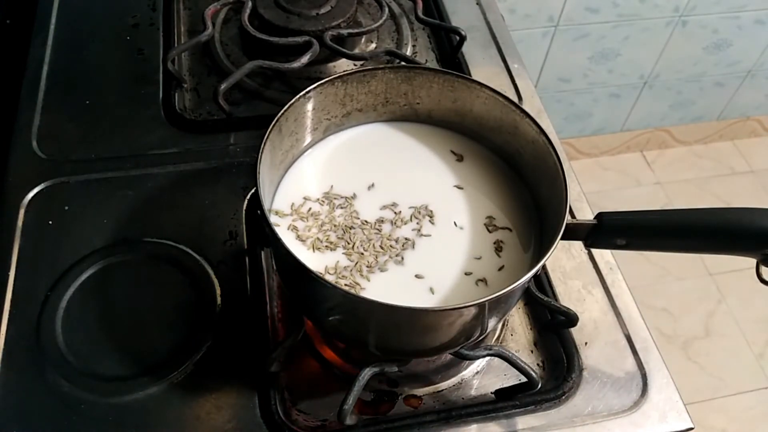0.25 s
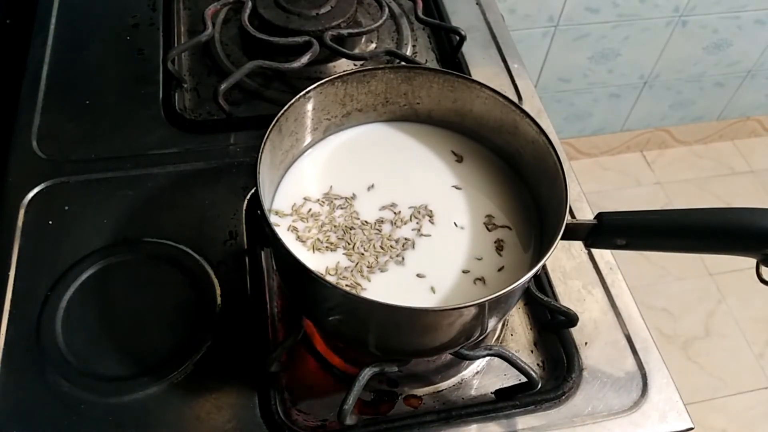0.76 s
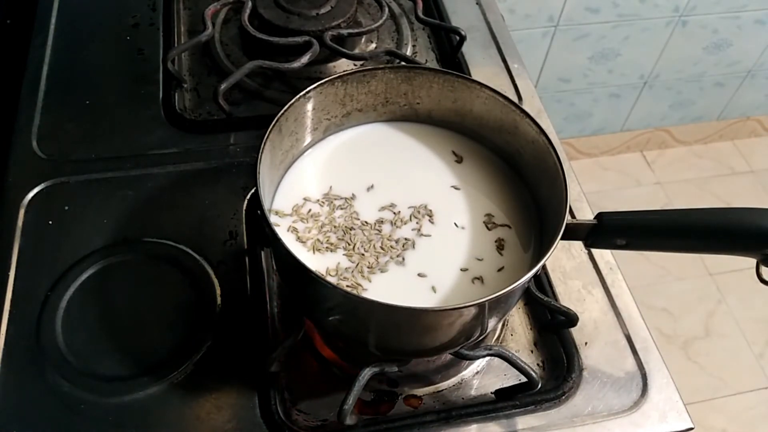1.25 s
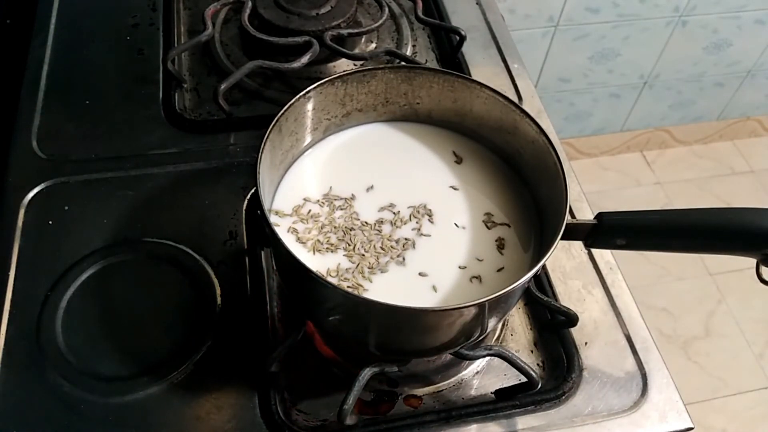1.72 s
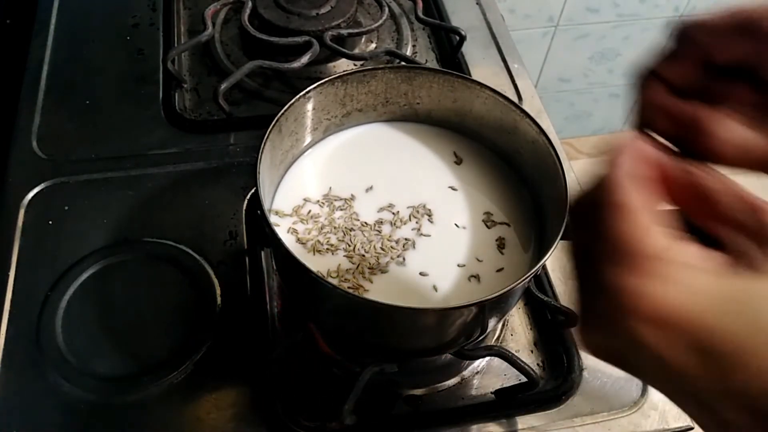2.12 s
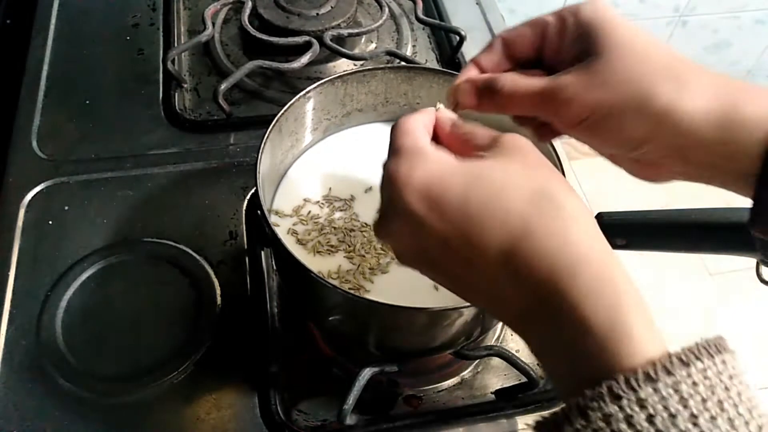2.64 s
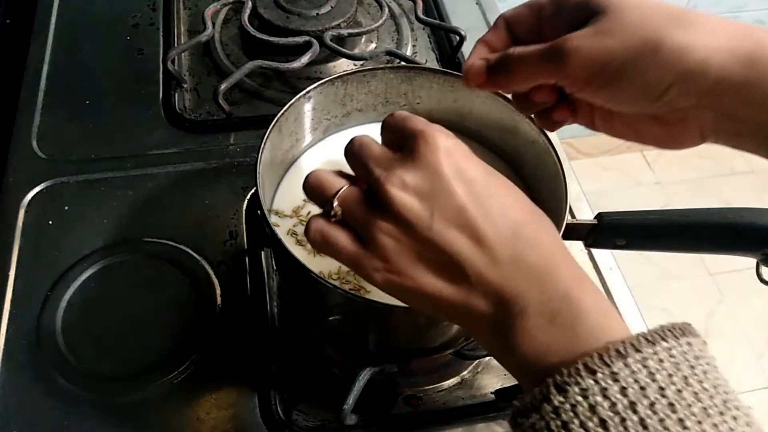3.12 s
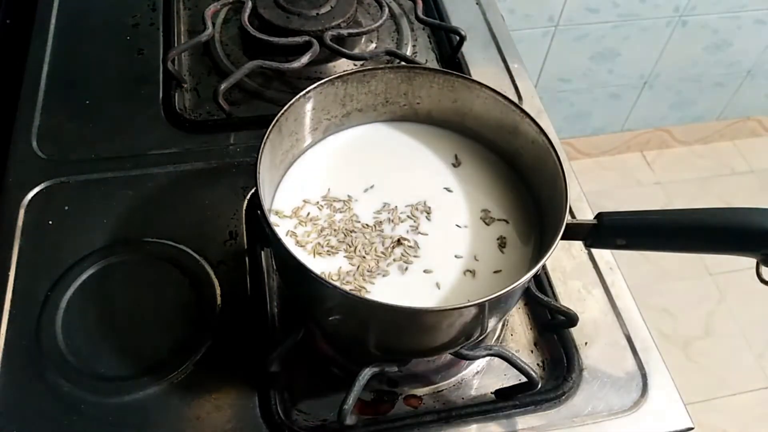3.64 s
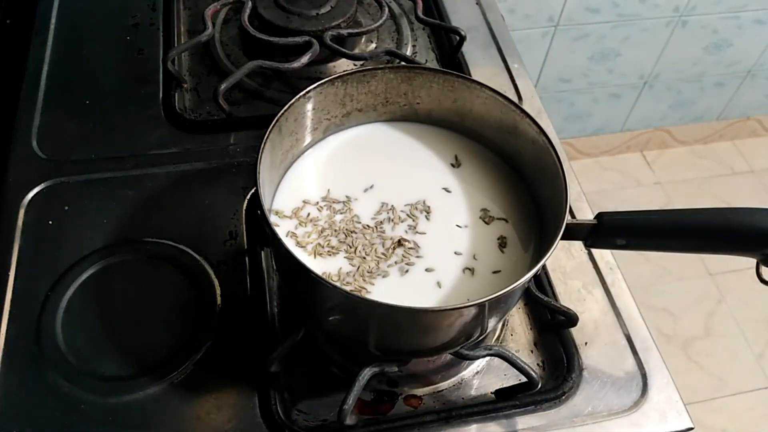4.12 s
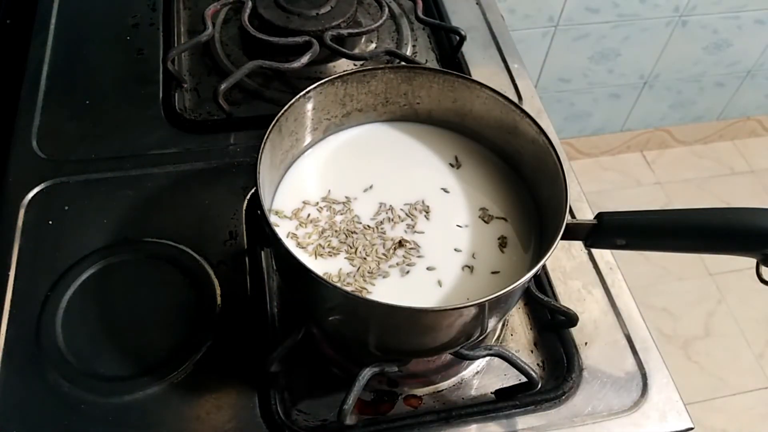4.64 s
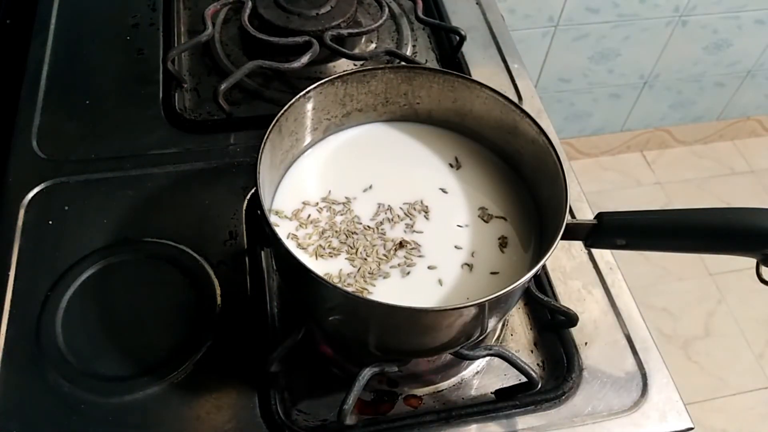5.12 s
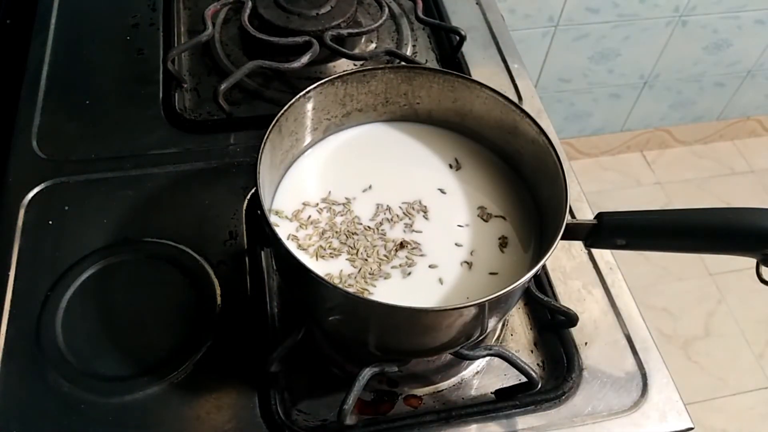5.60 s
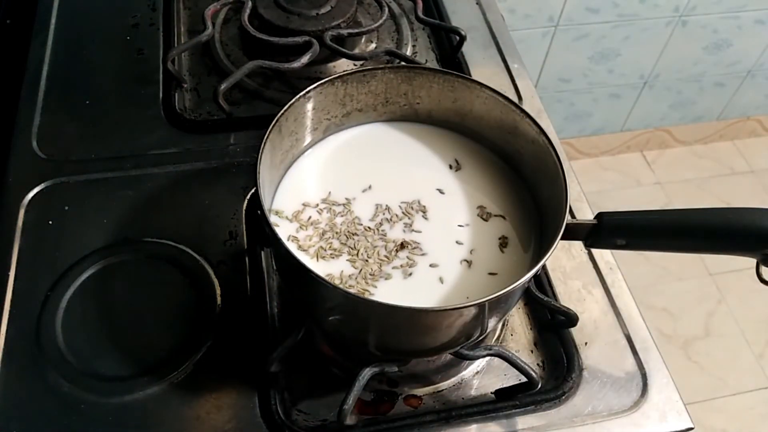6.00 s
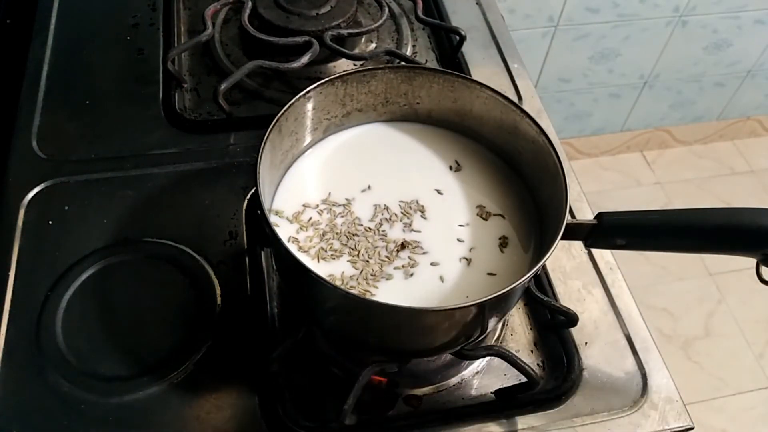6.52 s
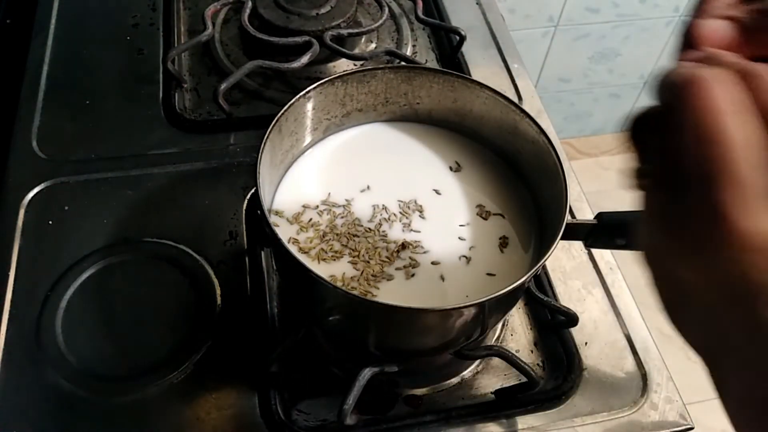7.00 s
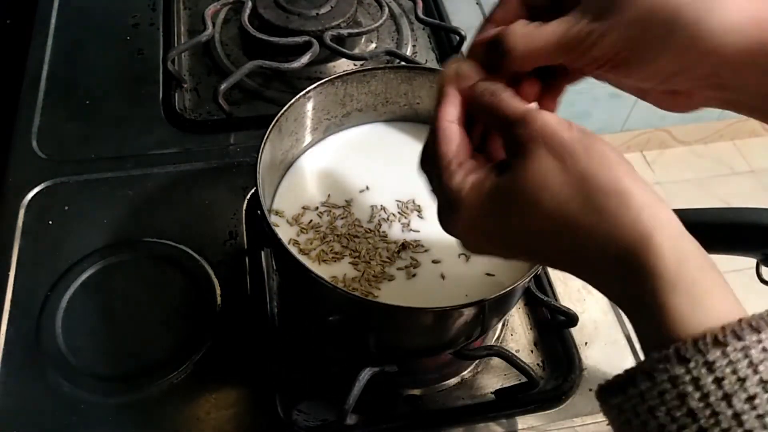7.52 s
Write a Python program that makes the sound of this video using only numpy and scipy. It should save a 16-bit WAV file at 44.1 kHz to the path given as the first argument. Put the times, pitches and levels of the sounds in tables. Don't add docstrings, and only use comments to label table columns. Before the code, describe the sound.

Throughout about eight seconds, a gas burner hisses close by, bright and airy around 3 to 10 kHz, with a softer fluttering flame below and a faint, wavering low boom of room and street rumble. Phone noise reduction makes the hiss slightly patchy, slowly sagging and springing back. At 0.2 s a crisp cluster of tiny metallic ticks snaps on the left. A barely audible knock follows at 0.9 s, a faint tick at 1.1 s, a light double tick at 2.1 s, and another with a soft knock at 3.65 s. At 5.55 s comes the loudest event: a sharp metal click with quick rebounds and a short bright tiled echo, small ticks trailing to 5.85 s. A dull low knock sounds near 6.1 s. From 7 s the hiss dulls a little on the left, with tiny faint ticks and light taps around 7.6 to 7.7 s.

```python
import sys
import numpy as np
from scipy import signal
from scipy.io import wavfile
from scipy.ndimage import uniform_filter1d, minimum_filter1d

SR = 44100
rng = np.random.default_rng(int(sys.argv[2]) if len(sys.argv) > 2 else 0)


def voltage_ratio(level):
    return 10 ** (np.asarray(level, float) / 20)


def file_out(sig):
    cols = np.atleast_2d(sig).T
    lim = np.clip(cols, -1, 1)
    pcm = np.round(lim * 32767).astype(np.int16)
    wavfile.write(sys.argv[1], SR, pcm)


N = 342216
FRAME = 1024


def gas_and_room(hz, t):
    # (frequency [Hz], density [dB per Hz])
    hiss = [(1760, -44), (3000, -11.5), (3720, -9), (4260, -3), (5150, -4), (7160, 1.5), (9860, -10.5),
            (10500, -10.5), (13600, -19.5), (22000, -120)]
    # (frequency [Hz], density [dB per Hz])
    roar = [(780, -17.5), (1020, -5), (1280, -4.5), (1410, -2), (2380, -3), (2730, 0.5), (3800, -8.5),
            (4940, -48), (8360, -120)]
    # (frequency [Hz], density [dB per Hz])
    edge = [(5880, 1), (10000, 6.5), (10500, -5), (13700, 5.5), (14400, -3), (14600, -54)]
    # (frequency [Hz], density [dB per Hz])
    hum = [(170, -27), (195, -30), (222, 3), (245, -3), (285, -6), (330, -11.5)]
    # (frequency [Hz], density [dB per Hz])
    murmur = [(250, -20), (310, 0.5), (450, 0.5), (560, -8), (660, -27)]
    # (frequency [Hz], density [dB per Hz])
    cavity = [(520, -21), (630, 4), (720, 5.5), (800, -5), (900, -43), (1000, -41)]
    # (frequency [Hz], density [dB per Hz])
    rumble = [(18, -40), (30, -20), (62, -17), (85, -2), (125, -9.5), (190, -3.5), (240, -10.5)]
    # (time [s], level [dB])
    flame = [(0.0, -66), (0.5, -75), (0.75, -71.5), (0.91, -62), (1.19, -75.5), (1.56, -67), (1.77, -80),
             (2.2, -65), (3.24, -75), (3.57, -68), (3.95, -66.5), (4.11, -65), (4.93, -70), (5.64, -66),
             (5.98, -75), (6.4, -69), (6.7, -77), (7.76, -75)]
    layers = [
        (hiss, layer_db((-41.5, 0.2855, -0.0233, 0.3), t)),
        (roar, layer_db((-52, 0.66, 0.12, -1.5), t)),
        (edge, layer_db((-51, 0.23, -0.03, -14), t)),
        (hum, layer_db((-60, 0.19, 0.15, -0.5), t)),
        (murmur, layer_db((-63, 0.35, 1, 0.5), t)),
        (cavity, np.interp(t, *np.transpose(flame)) + 4.5),
        (rumble, np.full(len(t), -58.0)),
    ]
    power = 0
    for shape, db in layers:
        inside = (hz >= shape[0][0]) & (hz <= shape[-1][0])
        density = inside * voltage_ratio(colour(shape, hz)) ** 2
        power = power + np.outer(density / density.mean(), voltage_ratio(db) ** 2)
    return power


def patchiness(hz, t):
    shape = (len(hz), len(t))
    patchy_db = colour([(100, 0.74), (450, 3.2), (720, 1.65), (2000, 1.73), (7000, 1.5), (13000, 2.8)], hz)
    patches = patchy_db[:, None] * drift(shape, bins=5, frames=14)
    gain = voltage_ratio(patches + 0.63 * drift(shape, bins=200, frames=6))
    narrow = [(900, 2.4), (1900, 0.74), (2600, 0.37), (3700, 0.13), (4600, 0.34),
              (5500, 4.7), (9600, 5.0), (10600, 1.8), (12500, 0.85)]
    wide = [(9500, 4.5), (11000, 1.6), (12800, 1.05), (14000, 1.5)]
    for brink, bins, frames, share, drop_db in ((narrow, 3, 9, 0.018, -25), (wide, 14, 6, 0.029, -35)):
        beyond = drift(shape, bins, frames) - colour(brink, hz)[:, None] - share * (reduction(t) + 4)
        gain = gain * voltage_ratio(drop_db * np.clip(4 * beyond, 0, 1))
    return gain


def coloured_spells(hz, t):
    # (time [s], half length [s], centre [Hz], width [Hz], boost [dB])
    spells = [(2.87, 0.22, 960, 170, 9.5), (7.4, 0.24, 300, 62, 5), (6.6, 0.19, 340, 113, -16),
              (1.22, 0.12, 304, 60, 8.5), (1.51, 0.14, 346, 73, -17), (1.915, 0.087, 284, 48, 10.5),
              (3, 0.45, 580, 47, -12), (5.7, 0.4, 520, 78, -12), (7.3, 0.71, 870, 60, -13),
              (0.935, 0.11, 490, 62, 18), (7.45, .25, 3150, 60, -16), (7.47, 0.21, 2800, 54, -17),
              (8.3, 0.22, 1900, 62, -17), (7.25, .14, 5100, 55, -17), (12, .07, 2850, 55, -16),
              (6.9, .04, 4500, 170, -20), (7.73, .05, 4700, 550, -2), (7.63, 0.057, 1900, 520, -8),
              (7.55, 0.18, 4900, 600, -0.5), (6.2, 0.16, 2150, 76, -15), (6.1, .2, 2430, 49, -6),
              (6.9, .15, 1940, 71, -14), (1.7, 0.04, 740, 310, 8.5), (1.45, 0.42, 930, 50, -13),
              (4.6, 0.17, 1000, 50, -7), (7.1, 0.13, 760, 84, 15), (7.12, 0.095, 1900, 1600, -11.5),
              (6.41, 0.04, 1670, 260, -6), (0.08, 0.088, 410, 62, 0), (2.42, 0.1, 730, 60, -10)]
    boost_db = 0
    for s, half, centre, width, db in spells:
        spectrum = np.exp(-((hz - centre) / width) ** 2)
        boost_db = boost_db + db * np.outer(spectrum, np.exp(-((t - s) / half) ** 2))
    return voltage_ratio(boost_db * (hz < 5000)[:, None])


def steady():
    # (frequency [Hz], left-right correlation)
    likeness = [(60, 0.81), (130, 0.91), (290, 0.68), (640, 0.53), (1400, -0.03), (3080, 0.55),
                (6770, 0.014), (14900, 0.32)]
    # (frequency [Hz], left minus right [dB])
    left_lean = [(60, 1.5), (300, 0), (480, 8), (700, 0), (1000, -1), (1800, 2.5), (2800, 0), (3700, 0.0)]
    # (frequency [Hz], left minus right [dB])
    port_lean = [(4000, 0), (5400, -2), (6200, -5), (6850, -4.5), (7450, 5), (8500, 4.5), (10000, 2),
                 (13000, 2)]
    grid = dict(nperseg=FRAME * 2, noverlap=FRAME * 2 - FRAME // 4)
    hz, t, (mid, side) = signal.stft(rng.standard_normal((2, N)), SR, **grid)
    gain = np.sqrt(gas_and_room(hz, t)) * patchiness(hz, t) * coloured_spells(hz, t)
    like = np.clip(colour(likeness, hz), -.99, .99)[:, None]
    mid, side = mid * np.sqrt((1 + like) / 2), side * np.sqrt((1 - like) / 2)
    pan_db = 1.13 + 0.11 * reduction(t)
    fixed_lean_db = (colour(left_lean, hz) + colour(port_lean, hz))[:, None]
    lean = voltage_ratio((fixed_lean_db + np.outer(hz > 1000, pan_db)) / 2)
    shade = voltage_ratio(-7.5 * np.outer(np.exp(-((hz - 6200) / 1100) ** 2), np.interp(t, [7.05, 7.5], [0, 1])))
    pair = np.array([(mid + side) * lean * shade, (mid - side) / lean]) * gain / np.sqrt((1 + like) / 2)
    return signal.istft(pair, SR, **grid)[1][:, :N]


def ticks():
    # (time [s], peak [dB], left minus right [dB], body [dB], sparkle above 10 kHz [dB])
    tick_events = [(0.1906, -20, 14, -4, 2), (0.1914, -13, 17.5, -0.5, 3.5), (0.1933, -15, 12, -2, -8),
                   (0.1975, -23, 12, -12, -4), (0.1985, -21, -8, -3, -4), (0.2002, -21, 15, -10, -6),
                   (0.206, -28, -4, -16, -14), (1.1173, -23, 4, -23, -14), (2.1244, -16, 9, -12, -7),
                   (2.133, -21, 11, -14, -6), (2.139, -28, 8, -16, -9), (3.6523, -15.5, 8, -4, -20),
                   (3.6592, -30, 0, -14, -16), (3.9958, -28, 8, -17, -13), (5.1892, -31, 0.0, -17, -18),
                   (5.5323, -29, 9, -17, -15), (5.5521, -4.5, 6, -10, -12), (5.5534, -12, 10, -6, -12),
                   (5.5546, -10, -12, -27, 6), (5.5581, -13, 16, -26, -11), (5.559, -11, 14, -20, -5),
                   (5.5646, -19, 12, -15, -2), (5.5735, -23, 4, -20, -6), (5.5775, -27, -4, -20, -14),
                   (5.5878, -22, -8, -20, -14), (5.592, -22, 8, -20, -10), (5.606, -25, 8, -18, -14),
                   (5.6713, -15.5, 16, -29, -14), (5.6745, -25, -6, -15, -16), (5.6776, -24, 16, -24, -8),
                   (5.8466, -27, -1, -20, -13), (7.011, -25, 12, -12, 8), (7.2955, -36, 8, -16, -16),
                   (7.4665, -32, 8, -14, -16), (7.6039, -31.5, 26, -8, 18), (7.6703, -32, 26, -6, 11),
                   (7.6722, -30, 24, -8, 10), (7.6772, -36, 20, -6, 12), (7.6824, -25, 23, -3, 9),
                   (7.6845, -39, 18, -3, -1)]
    t = np.arange(FRAME // 2) / SR
    envelope = np.exp(-t / 0.0007) * (1 - np.exp(-t / 0.0004))
    scrape = 1.63 * rng.standard_normal((len(tick_events), len(t))) * envelope
    slips = scrape + 3.2 * (t == t[16])
    body = signal.sosfilt(signal.butter(1, [900, 5200], "band", fs=SR, output="sos"), slips)
    sparkle = signal.sosfilt(signal.butter(2, [9600, 13900], "band", fs=SR, output="sos"), slips)
    upper = voltage_ratio(-8) * band(band(slips, 9300, 1800), 9300, 3000)
    body_db, sparkle_db = np.array(tick_events)[:, 3:].T[:, :, None]
    ports = []
    for k, (ring_hz, shadow_db) in enumerate([(7350, 3), (6400, -27)]):
        ring = band(band(slips, ring_hz, 1500), ring_hz, 3500)
        sounds = 4.6 * (ring + upper) + voltage_ratio(body_db) * body + voltage_ratio(sparkle_db + shadow_db) * sparkle
        ports.append(place(sounds, tick_events)[k])
    return np.array(ports)


def knocks():
    # (time [s], peak [dB], left minus right [dB], ring [Hz], decay by 60 dB [s])
    knock_events = [
        (0.191, -42, 19, 1590, 0.013),
        (.902, -40, 9, 435, 0.011),
        (1.504, -55, 19, 510, 0.014),
        (3.65, -44, 12, 550, 0.007),
        (6.12, -40, 17, 417, 0.017),
        (7.6857, -31.5, 16, 2000, 0.0038),
        (7.6935, -33, -2, 2240, 0.005),
    ]
    t = np.arange(FRAME * 4) / SR
    sounds = []
    for _, _, _, hz, t60 in knock_events:
        modes = np.sin(2 * np.pi * hz * t) + 0.52 * np.sin(2 * np.pi * 1.375 * hz * t)
        sounds.append(modes * voltage_ratio(-60 * t / t60) * (1 - np.exp(-t * hz * 0.47)))
    return place(sounds, knock_events)


def kitchen(sharp, soft):
    # (delay [s], gain)
    echoes = [
        [(.0011, 0.23), (.0031, 0.11)],
        [(.0015, 0.6), (.0034, .45), (.0052, .3), (.009, .25)],
    ]
    port_hz, port_width_hz, port_db = [6500, 6380], [1940, 800], [10, 14.5]
    tail_lean_db, wash_db = [1.5, -2], [-1, 0]
    t = np.arange(int(.7 * SR)) / SR
    loud = sharp.mean(axis=0)
    peak = -minimum_filter1d(-np.abs(loud), size=FRAME)
    loud = loud * (peak / peak.max()) ** 1.7 * np.sign(rng.standard_normal(N))
    out = []
    for k, x in enumerate(sharp + soft):
        tail = voltage_ratio(-31 + tail_lean_db[k]) * rng.standard_normal(len(t)) * (1 - np.exp(-t / 0.00065))
        long, short = tail * voltage_ratio(-60 * t / 0.42), tail * voltage_ratio(-60 * t / 0.28)
        ring = band(band(long, port_hz[k], port_width_hz[k]), port_hz[k], 2 * port_width_hz[k])
        wash = band(band(short, 8600, 5000), 8600, 5000)
        response = voltage_ratio(port_db[k]) * ring + voltage_ratio(-11) * band(short, 3700, 3000) + voltage_ratio(wash_db[k]) * wash
        early = sum(g * np.roll(x, int(lag * SR)) for lag, g in echoes[k])
        wet = signal.fftconvolve(loud, response)
        wet = wet + signal.fftconvolve(voltage_ratio(-1.5) * soft.mean(axis=0), long)
        out.append(early + x + wet[:N])
    return np.array(out)


def room_modes():
    # (frequency [Hz], wander [Hz], width of the noisy skirt [Hz])
    modes = [
        (101, 8.9, 19.7),
        (129.9, 6.1, 17),
        (161.6, 6.6, 32),
    ]
    # (level [dB], share of noise reduction, share of traffic, share of flame fade)
    mode_mix = [
        (-59.5, 0.0068, .01, -7),
        (-60.5, .01, 0.3, -2),
        (-60, .01, 0.42, -8.5),
    ]
    # (time [s], mode number, boost [dB], half length [s])
    swells = [(1.898, 0, 8, 0.12), (5.914, 0, 7, 0.041), (7.472, 0, 8, 0.066), (2.214, 0, 12, 0.1),
              (2.5, 0, 8, 0.092), (3.055, 0, 11, 0.08), (3.697, 0, 7.5, 0.2), (6.156, 0, 10.5, 0.45),
              (6.84, 0, 13.5, 0.15), (7.098, 0, 15.5, 0.086), (7.29, 0, 7, 0.076), (7.58, 0, 9.5, 0.095),
              (3.09, 1, 8, 0.14), (3.688, 1, 8.5, 0.14), (4.26, 1, 15, 0.12), (5.197, 1, 6.5, 0.2),
              (5.95, 1, 7.5, 0.17), (7.447, 1, 4, 0.088), (0.116, 2, 7.5, 0.1), (2.23, 2, 8, 0.066),
              (2.49, 2, 5, 0.07), (2.896, 2, -4, .06), (3.894, 2, 10, 0.027), (4.14, 2, 13, 0.087),
              (4.515, 2, 15.5, 0.15), (4.843, 2, 13, 0.08)]
    t, out = np.arange(N) / SR, 0
    for k, ((hz, wander, width), mix) in enumerate(zip(modes, mode_mix)):
        waver, flutter = slow_noise(2200), slow_noise(1300)
        tone = np.sqrt(2) * np.sin(2 * np.pi * np.cumsum(hz + .5 * wander * waver) / SR)
        skirt = band(band(rng.standard_normal(N), hz, width), hz, width)
        swell_db = sum(db * np.exp(-((t - s) / half) ** 2) for s, mode, db, half in swells if round(mode) == k)
        db = layer_db(mix, t) + swell_db + 1.54 * flutter
        out = out + voltage_ratio(db) * (0.81 * tone + 0.64 * skirt / skirt.std())
    return np.outer(voltage_ratio([.25, -.25]), out)


def layer_db(mix, t):
    # (time [s], level [dB])
    traffic = [(0.0, -62.5), (0.56, -84.5), (1.06, -75.5), (1.34, -85.5), (1.79, -84.5), (2.1, -69),
               (2.59, -62), (3.11, -70.5), (4.23, -66), (4.65, -80), (5.08, -78.5), (5.47, -63.5),
               (5.77, -67.5), (5.92, -72), (6.27, -94), (6.59, -79.5), (7.37, -76), (7.76, -64)]
    db, reduced, street, fade = mix
    street_db = np.interp(t, *np.transpose(traffic)) + 66
    return db + reduced * reduction(t) + street * street_db + fade * -0.0176 * t


def reduction(t):
    # (time [s], depth just before [dB], depth just after [dB])
    springs = [(0.0, -2, -1.5), (0.19, -0.5, 5), (0.67, -2.5, 8), (1.3, -1.5, 5), (1.928, -5.5, 3),
               (3.45, -9, 4), (4.36, -5.5, 1), (4.86, -6, 5), (5.5, -6.5, 7.5), (6.05, -9, -9.5),
               (6.36, -8, 8), (6.9, -10, -3.5), (7.03, -8.5, -12), (7.19, -8.5, -1.5), (7.66, -13.5, 0),
               (7.9, -16, -4)]
    s, before, after = np.transpose(springs)
    k = np.clip(np.searchsorted(s, t, side="right") - 1, 0, len(s) - 2)
    progress = np.clip((t - s[k]) / (s[k + 1] - s[k]), 0, 1)
    sag = after[k] + (before[k + 1] - after[k]) * progress ** 0.69
    return sag + (before[k] - after[k]) * np.clip(1 - (t - s[k]) / 0.027, 0, 1)


def place(sounds, table):
    out = np.zeros((2, N + FRAME * 4))
    for sound, (s, db, pan_db, *_) in zip(sounds, table):
        i = int(s * SR)
        gains = voltage_ratio(db + np.array([pan_db, -pan_db]) / 2)
        out[:, i:i + len(sound)] += np.outer(gains, sound / np.abs(sound).max())
    return out[:, :N]


def colour(points, hz):
    f, v = np.transpose(points)
    return np.interp(np.log(hz + 1), np.log(f), v)


def band(x, hz, width):
    return signal.lfilter(*signal.iirpeak(hz, hz / width, fs=SR), x)


def drift(shape, bins, frames):
    field = rng.standard_normal(shape)
    for _ in range(2):
        field = uniform_filter1d(uniform_filter1d(field, size=bins, axis=0), size=frames, axis=1)
    return field / field.std()


def slow_noise(size):
    x = uniform_filter1d(uniform_filter1d(rng.standard_normal(N), size=size), size=size)
    return x / x.std()


def scene():
    left, right = steady() + room_modes()
    return np.array([np.roll(left, 2), right]) + kitchen(ticks(), knocks())


def roll_off(x):
    return signal.sosfilt(signal.butter(12, 15490, fs=SR, output="sos"), x)


def record(dry):
    top = signal.butter(14, 13820, fs=SR, output="sos")
    return roll_off(signal.sosfilt(top, dry))


dry = scene()
out = record(dry)
file_out(out)
```